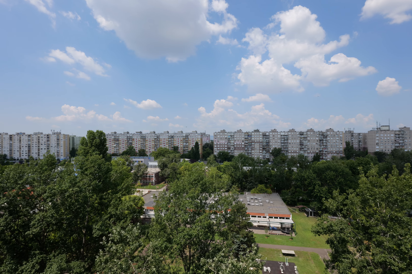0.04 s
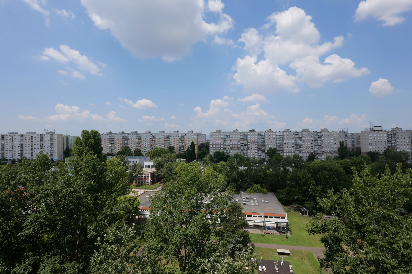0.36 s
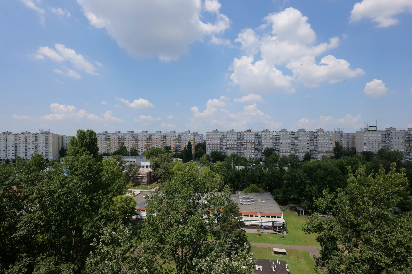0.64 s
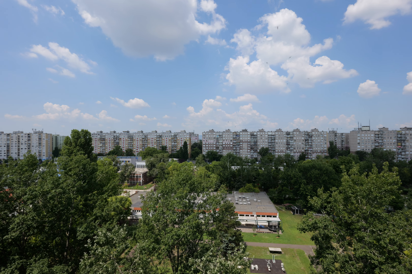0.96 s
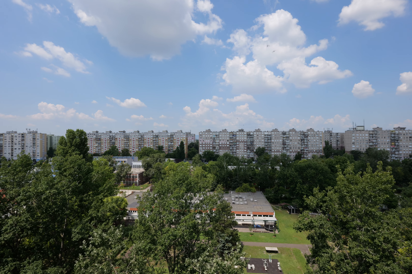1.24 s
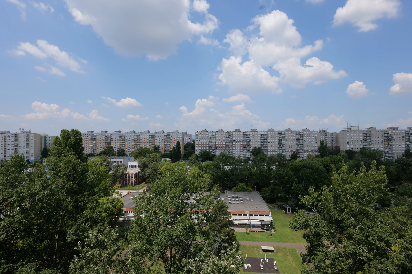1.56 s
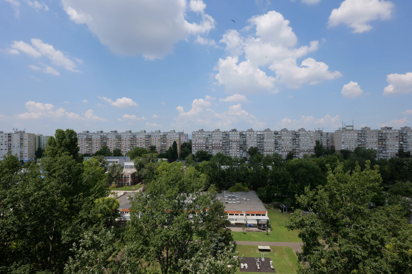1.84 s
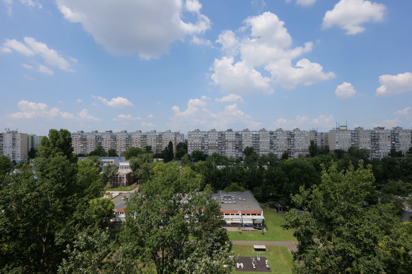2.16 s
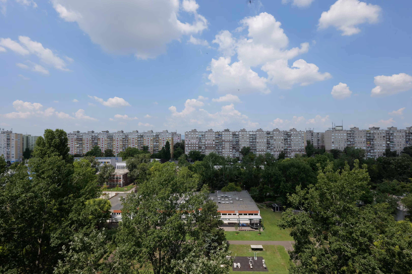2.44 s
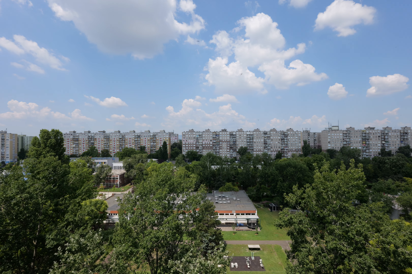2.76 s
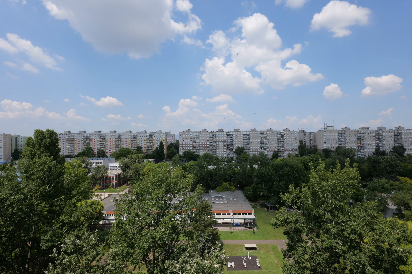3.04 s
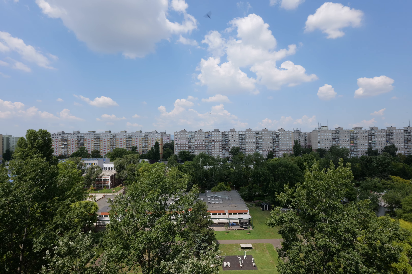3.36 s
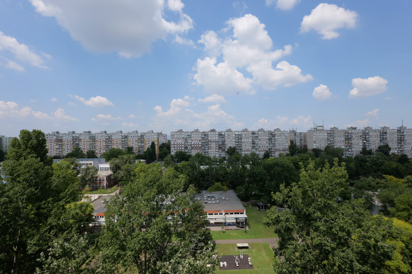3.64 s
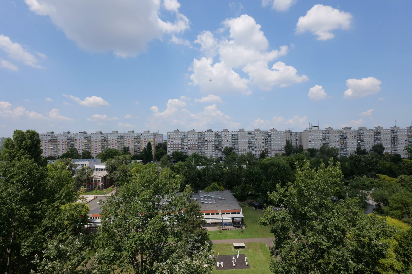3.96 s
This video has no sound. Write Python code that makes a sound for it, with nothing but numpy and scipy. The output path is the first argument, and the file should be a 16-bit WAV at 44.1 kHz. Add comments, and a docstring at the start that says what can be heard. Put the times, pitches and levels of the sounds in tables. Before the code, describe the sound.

Shrill, trilling screams of passing swifts ring out above distant traffic rumble.

```python
"""A city rumbles below a high balcony, and swifts give a few thin calls from farther off.
From 1.2 s they race past and scream four times, echoed by nearby walls and blocks across the park.
Each scream is a high lead-in, a drop to a whistle chopped about 250 times a second, then a falling
stutter of pips. A soft hiss rises with the first scream, and the rumble swells as that scream ends.
Near the end the hiss swells again and a small bird chirps far away."""
import sys
import numpy as np
from scipy import signal
from scipy.fft import rfft, irfft
from scipy.io import wavfile

SR = 44100
rng = np.random.default_rng(int(sys.argv[2]) if len(sys.argv) > 2 else 0)


def transcribe(u):
    """Save the signal u as a 16-bit wav file named by the first command-line argument.

    u: samples, shape (n,) or (channels, n), limited to [-1, 1]; the rate is SR.
    q: integer samples, one column per channel.
    """
    v = np.clip(np.atleast_2d(u).T, -1, 1)
    q = np.round(v * 32767).astype(np.int16)
    wavfile.write(sys.argv[1], SR, q)


N = 176400
T = np.arange(N) / SR
BINS = np.maximum(np.fft.rfftfreq(N, 1 / SR), 1)  # the frequencies of the spectrum, in Hz

# How each scream is chopped and where it sits:
# first_rate_hz, last_rate_hz, first_sharpness, last_sharpness, shrill_hz, left_over_right_db
TRILL_SHAPES = [(279, 270, 0.29, 21, 10950, -1.1), (280, 245, 0.8, 4.7, 11300, -1.7),
                (260, 200, 0.85, 1.3, 10600, 5.5), (266.6, 240, 1.1, 3.8, 12600, 0)]


def amp(db):
    """Turn decibels into a gain."""
    return 10 ** (np.asarray(db) / 20)


def unit(x):
    """Scale a sound to an average power of 1."""
    return x / np.sqrt(np.mean(x ** 2) + 1e-20)


def filtered(x, order, hz, kind):
    """Keep the "low", "high" or "band" part of a sound; a higher order cuts more steeply."""
    return signal.sosfilt(signal.butter(order, hz, kind, fs=SR, output="sos"), x)


def noise(gain):
    """Noise of power 1, shaped by a gain for each frequency."""
    return unit(irfft(rfft(rng.standard_normal(N)) * gain, N))


def wander(hz):
    """A random wobble, mostly slower than hz."""
    return noise(np.exp(-(BINS / hz) ** 2))


def colour(points):
    """A gain for each frequency, drawn through (frequency_hz, level_db) points."""
    hz, db = np.array(points).T
    return amp(np.interp(np.log(BINS), np.log(hz), db))


def span(start, end):
    """The samples of a sound, with a margin for its fades."""
    return slice(max(int((start - .02) * SR), 0), min(int((end + .02) * SR), N))


def gate(t, start, end, fade_s):
    """Switch smoothly on and off, with fades centred on start and end."""
    return np.sin(np.pi / 2 * np.clip(np.minimum(t - start, end - t) / fade_s + .5, 0, 1)) ** 2


def pan(x, db):
    """Place a sound so that the left is db louder than the right."""
    return x * amp(np.array([[db], [-db]]) / 2)


def wide_noise(gain):
    """Stereo noise, nearly the same on both sides in the bass and less alike in the treble."""
    # How wide the noise spreads: frequency_hz, side_over_middle_db
    spread = [(30, -3), (80, -33), (250, -28), (1100, -7.5), (12000, -6)]
    side = irfft(rfft(noise(gain)) * colour(spread), N)
    return noise(gain) + side * np.array([[1], [-1]])


def city():
    """Traffic rumble whose bass swells, a few hums and a thin hiss of air."""
    # The tone of the traffic: frequency_hz, relative_db
    traffic_tone = [(18, -60), (30, -34), (48, -32.5), (113, -1.5), (216, -1.5), (411, -7.5), (632, -13),
                    (754, -12.5), (899, -20), (1200, -17.5), (1650, -21), (2000, -28.5), (2340, -28.5),
                    (3100, -40), (4160, -63), (7040, -120)]
    # How the bass swells: time_s, relative_db
    bass_levels = [(0, -43.5), (1.678, -42), (1.77, -33.5), (1.87, -38.5), (4, -38)]
    # Hums of distant traffic and machines: pitch_hz, width_hz, level_db
    hum_bands = [(220.3, 31.4, -47.5), (593.4, 3, -59.5), (795, 7.6, -60)]
    # The tone of the air: frequency_hz, relative_db
    air_tone = [(1760, -34), (3000, 0), (4430, 0), (8990, -4.5), (15000, -10.5)]
    air_share = 1 / (1 + (3000 / BINS) ** 16)  # air takes over from traffic above 3000 Hz
    traffic = wide_noise(colour(traffic_tone) * np.sqrt(1 - air_share)) * amp(-38.5)
    bass = irfft(rfft(traffic) / (1 + (BINS / 310) ** 4), N)  # the part below 310 Hz
    times, bass_db = np.array(bass_levels).T
    swell = unit(amp(np.interp(T, times, bass_db)))
    hums = sum(amp(db) * noise(np.exp(-((BINS - hz) / width) ** 2)) for hz, width, db in hum_bands)
    air = wide_noise(colour(air_tone) * np.sqrt(air_share)) * amp(-63)
    return traffic + bass * (swell - 1) + hums + air


def rustle():
    """A soft hiss, perhaps of leaves, different on the left and right."""
    # How the hiss swells: time_s, level_db
    hiss_levels = [(0, -91), (1.4, -59.5), (2.7, -63.5), (3.3, -54.5), (3.62, -54), (3.748, -65), (4, -62)]
    centre_hz, width_octaves = 2650, 0.91
    band = np.exp(-(np.log2(BINS / centre_hz) / width_octaves) ** 2 / 2)
    times, db = np.array(hiss_levels).T
    return np.array([noise(band), noise(band)]) * amp(np.interp(T, times, db))


def echoes(x):
    """Sound scattered back by the balcony, the house front and the far blocks."""
    # One row per surface: delay_s, rise_s, time_to_fade_60_db_s, level_db
    surfaces = [(.004, 0.00042, 0.077, -10.5), (0.021, 0.0037, 0.27, -8.5), (.08, .05, 1.1, -26.5)]
    response, stereo_width = 0, 0.42
    for delay, rise, fade, db in surfaces:
        age = np.maximum(T[:SR] - delay, 0)
        middle, side = rng.standard_normal((2, SR))
        scatter = middle + stereo_width * side * np.array([[1], [-1]])
        tail = scatter * (1 - np.exp(-age / rise)) * np.exp(-np.log(1000) * age / fade)
        response = response + amp(db) * unit(tail) / np.sqrt(SR)
    return signal.fftconvolve(x[None], response, axes=1)[:, :N]


def whistle(hz, octave_db):
    """A bird's voice: a pure tone plus a raspy one an octave up (at twice the pitch)."""
    phase = 2 * np.pi * np.cumsum(hz) / SR
    rasp = amp(-7.5) * unit(filtered(rng.standard_normal((2, len(hz))), 2, 350, "low"))
    octave = unit((1 + rasp[0]) * np.sin(2 * phase) + rasp[1] * np.cos(2 * phase))
    return np.sqrt(2) * np.sin(phase) + amp(octave_db) * octave


def far_chirps():
    """A small bird's faint gliding notes, blurred by distance."""
    # One row per note: start_s, length_s, first_hz, last_hz, level_db
    notes = [(3.19, .17, 2340, 2230, -62), (3.65, .13, 2370, 2240, -59), (3.72, .28, 6000, 6450, -65)]
    out, jitter, flutter = np.zeros(N), wander(280), wander(48)
    for start, length, first_hz, last_hz, db in notes:
        end = start + length
        k = span(start, end)
        pitch = np.interp(T[k], [start, end], [first_hz, last_hz]) * (1 + 0.014 * jitter[k])
        note = whistle(pitch, octave_db=-26) * flutter[k]
        out[k] += note * gate(T[k], start, end, fade_s=0.09) * amp(db)
    return out


def peeps():
    """Swifts farther off give short, thin calls, each quavering around one pitch."""
    # One row per call: start_s, length_s, pitch_hz, level_db
    calls = [(0, 0.036, 4270, -53.5), (0.288, 0.034, 4370, -52.5), (0.612, 0.031, 4493, -48),
             (0.651, 0.07, 4485, -49.5), (0.985, 0.027, 4730, -42.5), (1.011, 0.054, 5744, -41.5),
             (1.227, 0.0076, 4670, -38)]
    out, jitter, flutter = np.zeros(N), wander(270), wander(210)
    for start, length, hz, db in calls:
        k = span(start, start + length)
        note = whistle(hz * (1 + .012 * jitter[k]), octave_db=-23) * (1 + .38 * flutter[k])
        out[k] += note * gate(T[k], start, start + length, fade_s=0.0043) * amp(db)
    return out


def beak_hiss(count):
    """Air rushing through the beak."""
    return unit(filtered(rng.standard_normal(count), 3, (3800, 11000), "band"))


def pips():
    """Each scream breaks into tiny gliding notes that step down in pitch."""
    # One list per scream, one row per pip: start_s, length_s, first_hz, last_hz, level_db
    pip_runs = [
        [(1.6824, 0.0046, 6030, 5830, -16.5), (1.6963, 0.0043, 5960, 5660, -19.5),
         (1.709, 0.0038, 5670, 5430, -18.5), (1.7223, 0.0033, 5750, 5430, -15),
         (1.735, 0.003, 5600, 5400, -17.5), (1.7481, 0.0029, 5520, 5410, -17),
         (1.7622, 0.0023, 5270, 5180, -16), (1.7755, 0.0024, 5040, 4790, -20.5),
         (1.789, 0.0029, 4430, 3580, -38)],
        [(2.4706, 0.0038, 5880, 5550, -24), (2.4902, 0.0075, 5550, 5390, -18.5),
         (2.5175, 0.0071, 5350, 5220, -20), (2.545, 0.0064, 4960, 5110, -23), (2.57, 0.0048, 4860, 4590, -24),
         (2.5935, 0.0073, 4370, 3470, -35)],
        [(2.849, 0.0061, 5750, 5480, -28.5), (2.862, 0.0072, 5650, 5470, -25.5),
         (2.8756, 0.006, 5700, 5570, -25.5), (2.89, 0.0065, 5730, 5260, -27),
         (2.904, 0.0066, 5550, 5290, -25.5), (2.917, 0.0054, 5500, 5040, -26.5),
         (2.928, 0.0084, 5420, 5060, -25.5)],
        [(3.251, 0.0063, 6490, 6350, -14), (3.2753, .007, 5480, 6360, -18), (3.303, .007, 5440, 6340, -21.5),
         (3.329, 0.0062, 5100, 4920, -23.5), (3.3555, 0.0042, 4670, 4380, -26.5),
         (3.3706, 0.0064, 5220, 5040, -28)],
    ]
    # Extra tones against the main one, one row per scream: octave_db, half_tones_db
    extra_tones = [(-18.5, -29), (-23.5, -48), (-32, -41), (-27, -25)]
    out, jitter, flutter = np.zeros((2, N)), wander(370), wander(600)
    for rows, (octave_db, half_db), (*_, pan_db) in zip(pip_runs, extra_tones, TRILL_SHAPES):
        for start, length, first_hz, last_hz, db in rows:
            end = start + length
            k = span(start, end)
            t = T[k]
            pitch = np.interp(t, [start, end], [first_hz, last_hz]) * (1 + .005 * jitter[k])
            phase = 2 * np.pi * np.cumsum(pitch) / SR
            # Strong and weak cycles take turns, adding tones at 1.5 and 0.5 times the pitch.
            half_tones = np.sin(1.5 * phase) + .5 * np.sin(phase / 2)
            note = whistle(pitch, octave_db) + amp(half_db) * half_tones + amp(-29) * beak_hiss(len(t))
            loudness = (1 + .06 * flutter[k]) * gate(t, start, end, fade_s=0.0012) * amp(db)
            out[:, k] += pan(note * loudness, pan_db)
    return out


def pulses(cycle, sharpness):
    """One rounded pulse per cycle; sharper pulses are shorter and taller."""
    angle = 2 * np.pi * cycle
    skewed = angle - 0.37 * (1 + np.cos(angle))  # makes each pulse lopsided
    return np.exp(-sharpness * np.cos(skewed) / 2) / np.sqrt(np.i0(sharpness))


def slide(cycle):
    """The pitch falls through each pulse and recovers between pulses."""
    return np.sin(2 * np.pi * cycle) / (2 * np.pi)


def trill(rate_hz, pitch_hz, sharpness, octave_db, wobbles):
    """A whistle chopped into uneven, falling pulses; also returns the running count of pulses."""
    rate_wobble, pitch_wobble, level_wobble = wobbles
    cycle = np.cumsum(rate_hz * (1 + 0.018 * rate_wobble)) / SR
    hz = pitch_hz * (1 + 0.11 * slide(cycle) + 0.01126 * pitch_wobble)
    return whistle(hz, octave_db) * pulses(cycle, sharpness) * amp(0.5 * level_wobble), cycle


def flicks(cycle, sharpness, wobble):
    """A high, falling flick opens each pulse; the throat lets only one band of it through."""
    centre_hz, throat_band_hz = 7110, (4600, 9750)
    early = cycle + 0.36 / np.sqrt(np.maximum(sharpness, 1))  # part of a cycle ahead of the pulse
    tone = whistle(centre_hz * (1 + 0.16 * slide(early) + 0.044 * wobble), octave_db=-60)
    return filtered(tone * pulses(early, 2.3 * sharpness), 2, throat_band_hz, "band")


def lead_ins(wobbles):
    """High, gently chopped whistles that lead into the screams."""
    # One list of points per lead-in: time_s, pitch_hz, relative_db
    lead_paths = [
        [(1.237, 5920, -38.5), (1.295, 5800, -36), (1.383, 6310, -25)],
        [(2.035, 5830, -48), (2.075, 6790, -44), (2.096, 6500, -34)],
        [(2.644, 5700, -33.5), (2.665, 5920, -36.5)],
        [(2.915, 6000, -40), (2.938, 7400, -46)],
        [(2.954, 6470, -28.5), (2.986, 7060, -19)],
    ]
    out = np.zeros((2, N))
    for rows in lead_paths:
        times, hz, db = np.array(rows).T
        k = span(times[0], times[-1])
        t = T[k]
        pitch = np.interp(t, times, hz)
        voice, _ = trill(rate_hz=310, pitch_hz=pitch, sharpness=0.66, octave_db=-28.5,
                         wobbles=wobbles[:, k])
        loudness = amp(np.interp(t, times, db) + 1) * gate(t, times[0], times[-1], fade_s=0.0023)
        out[:, k] += pan(voice * loudness, db=-1.5)
    return out


def screams():
    """After its lead-in, each loud trill slows and hardens; every pulse rings a shrill resonance."""
    # One list of points per scream: time_s, pitch_hz, level_db, flick_relative_db, octave_relative_db
    scream_paths = [
        [(1.384, 5310, -24.5, -41, -27), (1.41, 5570, -17.5, -58, -23), (1.475, 5870, -20.5, -29, -21),
         (1.51, 5770, -23, -11.5, -23.5), (1.6, 5940, -23, -10, -22.5), (1.645, 6180, -34, -0.5, -21),
         (1.68, 5920, -40, 12, -15)],
        [(2.097, 5560, -32.5, -21, -18), (2.163, 5695, -31, -29, -21.5), (2.175, 5720, -31.5, -12, -21),
         (2.255, 6120, -25.5, -15.5, -26), (2.36, 5910, -29, -11, -23), (2.452, 6150, -28.5, -6, -24)],
        [(2.666, 5230, -27, -35, -44), (2.69, 5230, -27, -28, -37), (2.74, 5415, -30.5, -24, -35),
         (2.81, 5330, -30, -36, -35), (2.843, 5590, -28, -30, -40)],
        [(2.986, 6090, -16.5, -41, -27), (3.03, 6180, -18, -38, -21), (3.055, 6280, -18, -14.5, -24),
         (3.1, 6295, -15.5, -19, -29), (3.2, 6110, -22.5, -4.5, -25), (3.243, 6480, -26, 1, -28)],
    ]
    shrill_width_hz, beak_hz = 650, 4120  # the beak sends out little sound below beak_hz
    wobbles, flick_wobble = np.array([wander(156), wander(400), wander(107)]), wander(1400)
    out = lead_ins(wobbles)
    for rows, shape in zip(scream_paths, TRILL_SHAPES):
        first_rate, last_rate, first_sharpness, last_sharpness, shrill_hz, pan_db = shape
        times, *columns = np.array(rows).T
        ends = [times[0], times[-1]]
        k = span(*ends)
        t = T[k]
        pitch, db, flick_db, octave_db = (np.interp(t, times, column) for column in columns)
        rate = np.interp(t, ends, [first_rate, last_rate])
        sharpness = np.exp(np.interp(t, ends, np.log([first_sharpness, last_sharpness])))
        voice, cycle = trill(rate, pitch, sharpness, octave_db - 0.5, wobbles[:, k])
        voice += flicks(cycle, sharpness, flick_wobble[k]) * amp(flick_db - 2.5)
        shrill = noise(1 / (1 + ((BINS - shrill_hz) / shrill_width_hz) ** 4))[k]
        voice += shrill * pulses(cycle, sharpness) * amp(octave_db - 5)
        out[:, k] += pan(voice * amp(db) * gate(t, *ends, fade_s=0.0027), pan_db)
    return filtered(out, 6, beak_hz, "high")


def scene():
    """Near and far birds with their echoes over the city."""
    near, far = screams() + pips(), peeps() + far_chirps()
    right_lag_s = .000008  # the near birds reach the right side slightly later
    near_right = irfft(rfft(near[1]) * np.exp(-2j * np.pi * BINS * right_lag_s), N)
    direct = np.array([near[0], near_right]) + far
    reflected = echoes(near.mean(axis=0) + amp(2.5) * far)  # far birds echo a little more
    return direct + reflected + city() + rustle()


def record(dry):
    """Cut away the highest treble, above 15600 Hz."""
    return signal.sosfilt(signal.ellip(10, .2, 80, 15600, fs=SR, output="sos"), dry)


dry = scene()
out = record(dry)
transcribe(out)
```